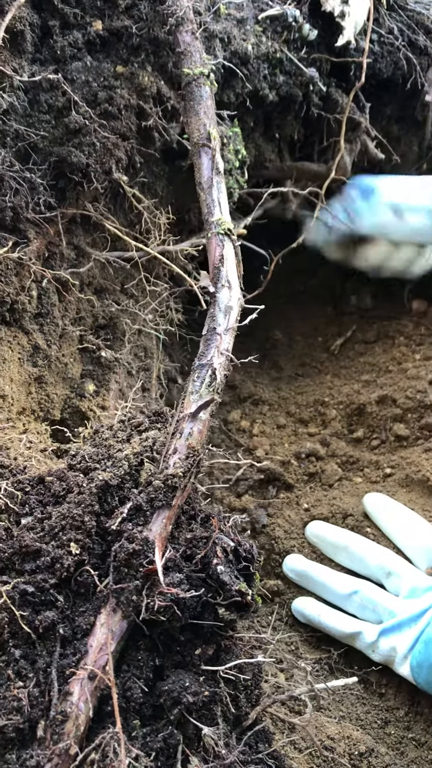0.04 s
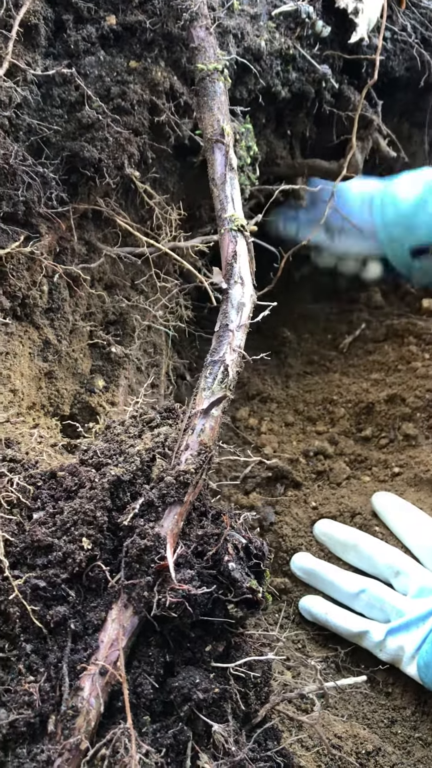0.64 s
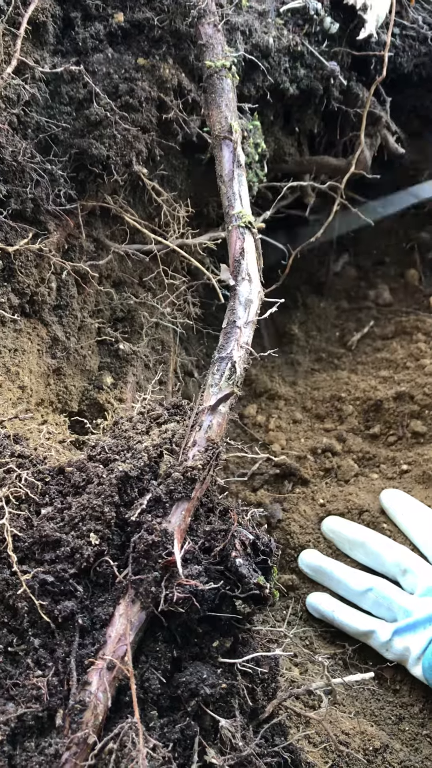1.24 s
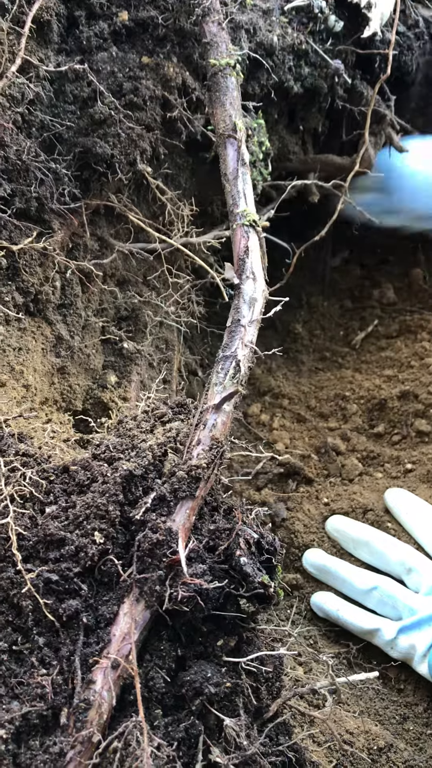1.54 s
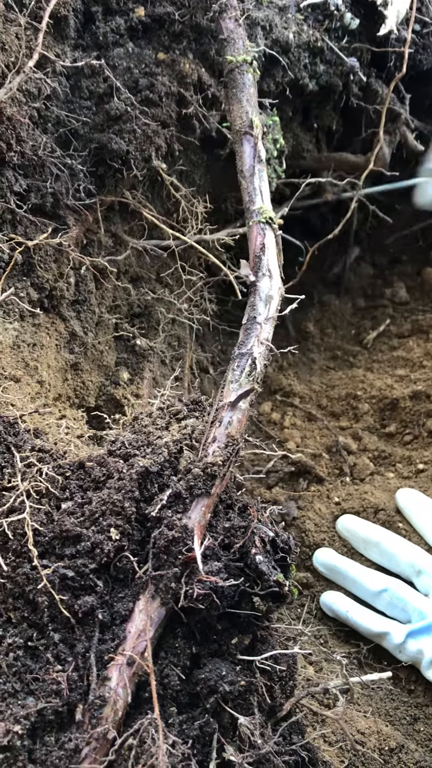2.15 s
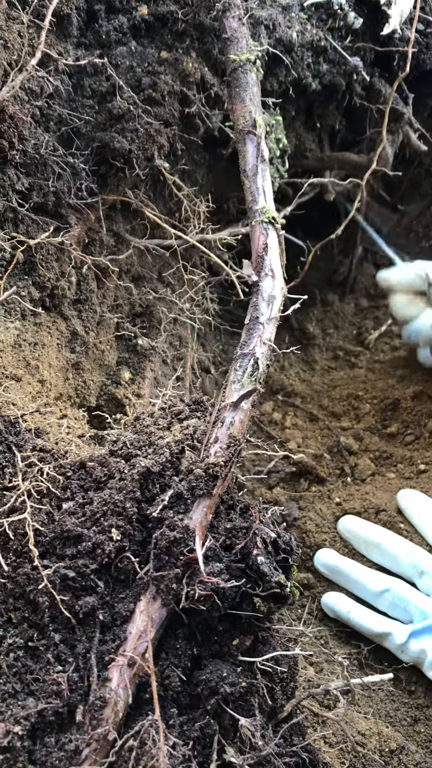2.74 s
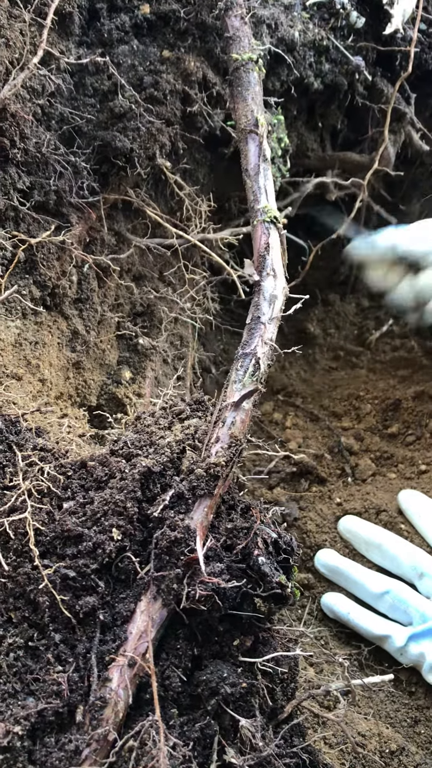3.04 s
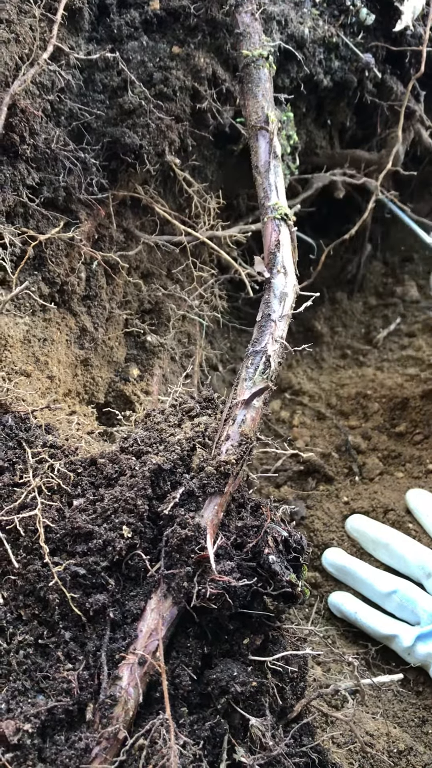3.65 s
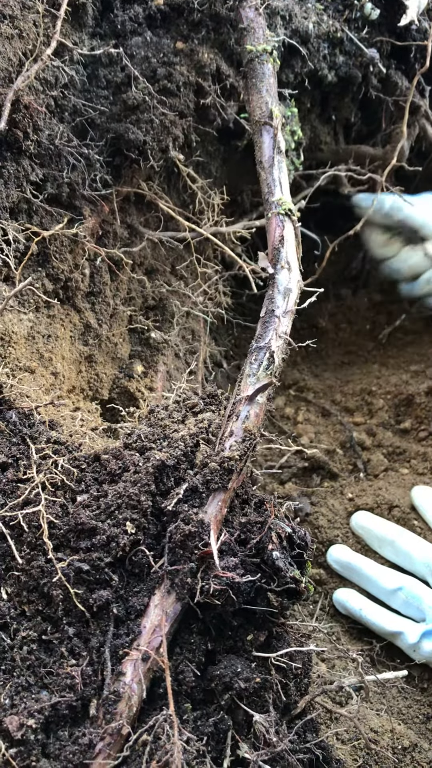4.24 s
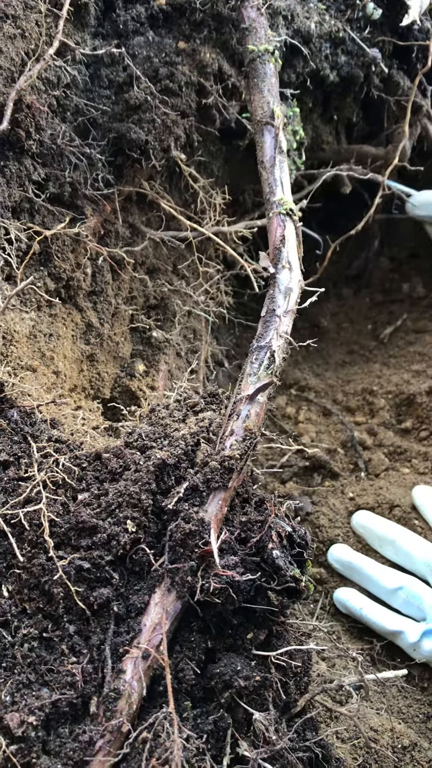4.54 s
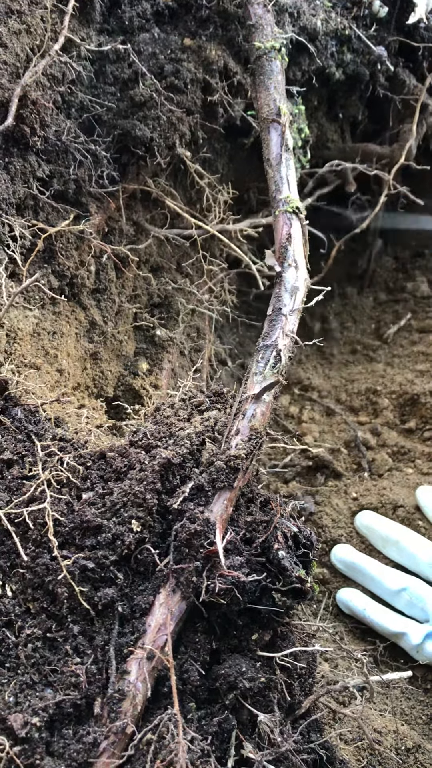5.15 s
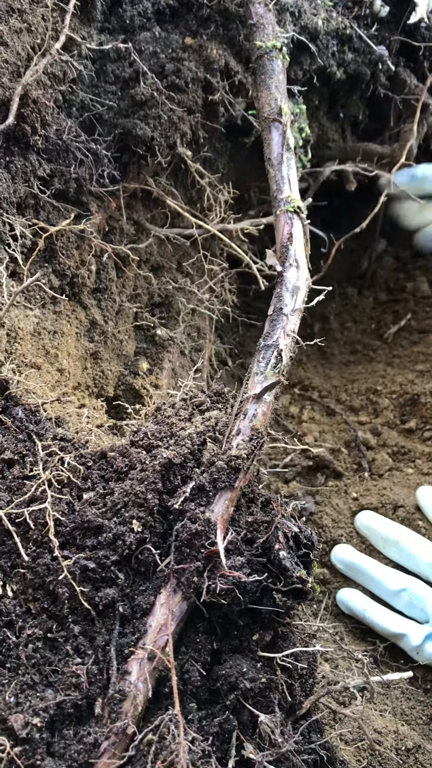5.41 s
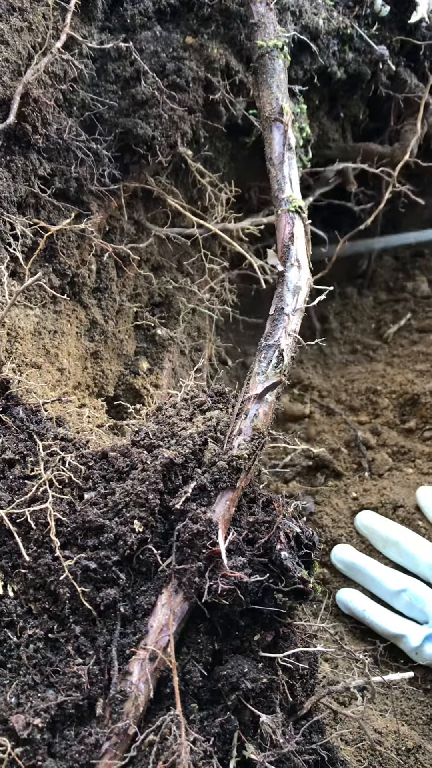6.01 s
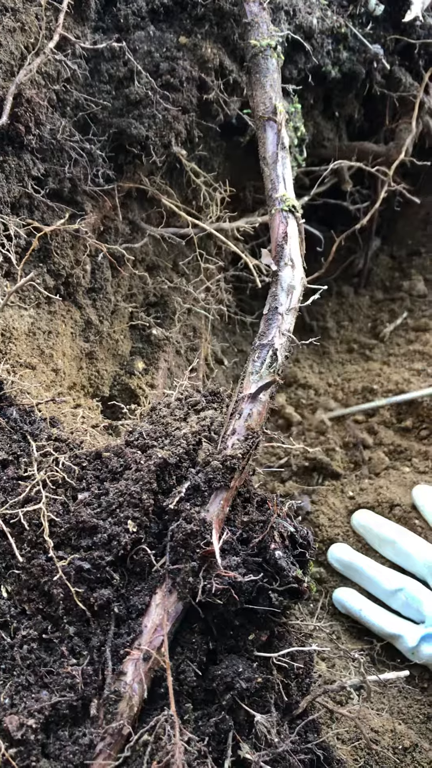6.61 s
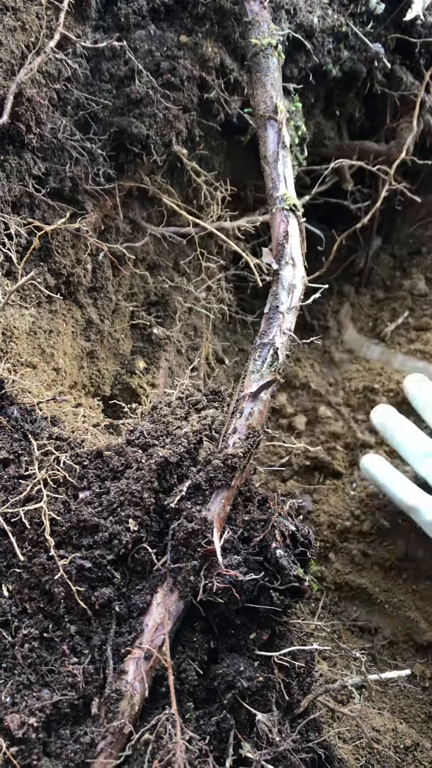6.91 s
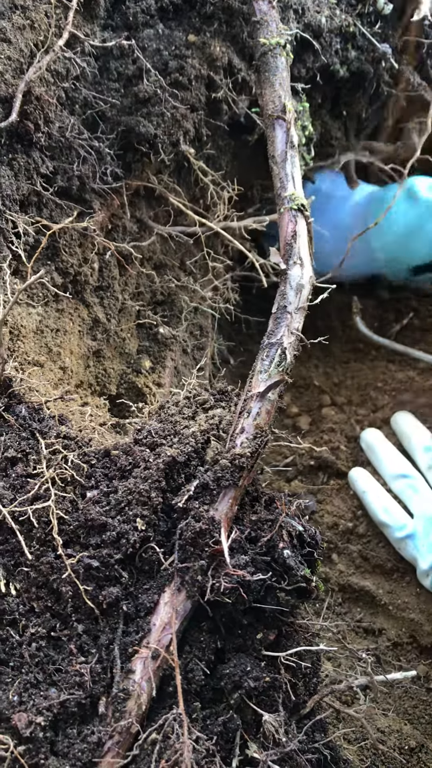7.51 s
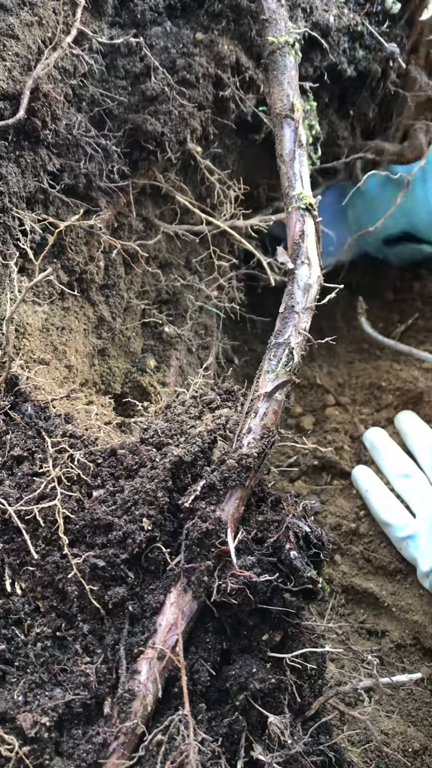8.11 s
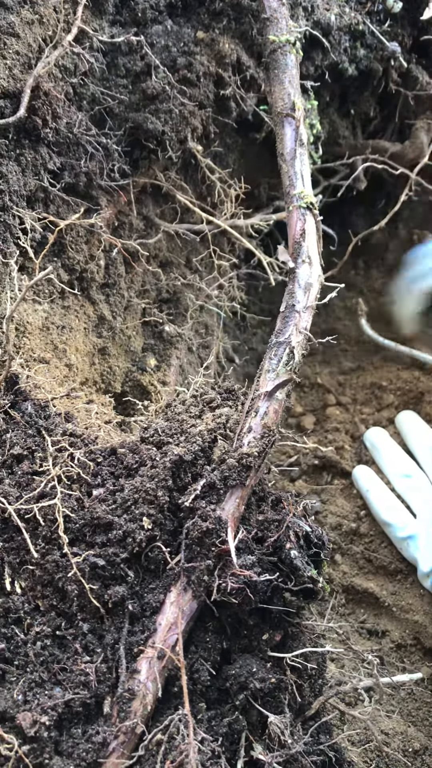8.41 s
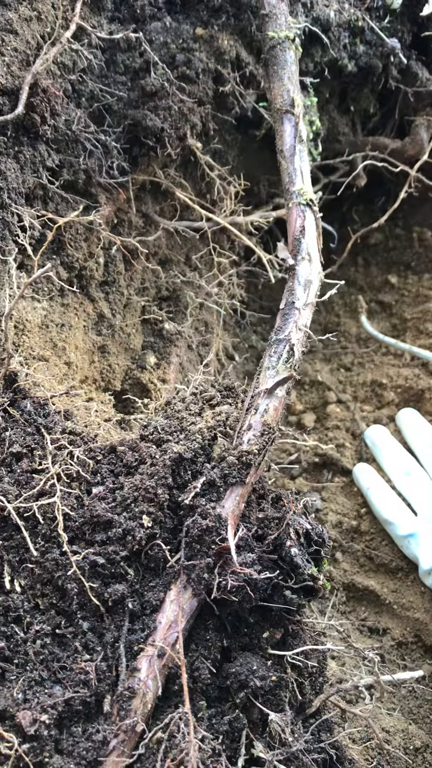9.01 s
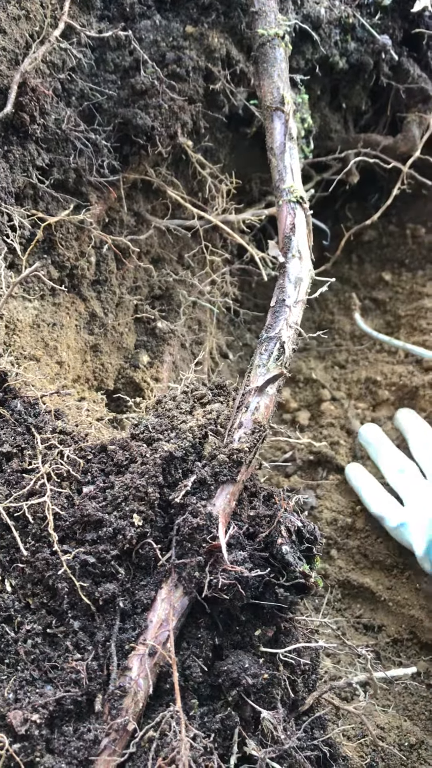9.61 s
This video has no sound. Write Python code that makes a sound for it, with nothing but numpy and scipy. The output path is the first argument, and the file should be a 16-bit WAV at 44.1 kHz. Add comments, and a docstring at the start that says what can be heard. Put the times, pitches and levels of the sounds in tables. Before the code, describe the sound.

Close digging in an earth bank: a metal tip pokes, grates and taps on stone, then loose soil is softly brushed out by hand.

```python
"""A steel tip clicks on a stone, close to the microphone, over a quiet outdoor rumble and a far-off whine.
The thin tool is poked and dragged through an earth bank: it grates through grit, its blade rings briefly,
the packed soil thuds, and the steel squeaks where it sticks and slips on stone.
Loose earth is swept out by hand, while crumbs trickle and snap in the hollow.
A few faint chirps come from the distance."""
import sys
import numpy as np
from scipy import signal
from scipy.fft import rfft, irfft, next_fast_len
from scipy.io import wavfile

SR = 44100
rng = np.random.default_rng(int(sys.argv[2]) if len(sys.argv) > 2 else 0)


def generate_wav(sig):
    """Save sig (samples, or channels by samples) to the path in sys.argv[1] as 16-bit PCM at SR."""
    pcm = np.round(np.clip(np.atleast_2d(sig).T, -1, 1) * 32767).astype(np.int16)
    wavfile.write(sys.argv[1], SR, pcm)


N = 434826
TIME = np.arange(N) / SR

# The blade grates through grit: (time [s], length [s], level [dB], hardest moment [0-1], body [dB],
# edge [dB], contact resonance [Hz], tip wedged [0-1])
GRIT_STROKES = [(0.048, 0.0077, -33, .2, -4, -24, 3020, 1), (0.823, .006, -46, .7, 39, 2, 800, 0.1),
                (0.848, 0.012, -40.5, .5, 9, -4.5, 3400, 0.05), (0.875, .016, -48.5, .5, 22, -2, 3400, 1),
                (0.898, 0.0071, -44, .2, 19, -8, 1500, 0.1), (1.175, 0.067, -54.5, 0.7, 15, -5, 2720, 0.87),
                (2.423, 0.034, -51, 0.6, -4.5, -9, 5700, 0.87),
                (2.456, 0.083, -60.5, 0.26, 1.5, -18, 4000, 1),
                (2.577, 0.057, -55.5, .95, 2, -9, 4700, 0.77),
                (2.656, 0.0067, -40, 0.35, -4, -4, 5070, 0.1), (2.728, 0.0036, -45, .8, 0, -14, 4000, 0),
                (2.7327, 0.0057, -28.5, .6, -2.5, -2, 4500, 0), (2.764, 0.0046, -30.5, 0.4, 0, -8, 1250, 1),
                (2.775, 0.0044, -27, .4, -3, -2, 1250, 1), (2.779, 0.0092, -27, 0.4, -5, -1, 3940, 0.88),
                (2.79, 0.037, -41, 0.4, -6, -10, 3320, 1), (2.826, .034, -42.5, 0.2, -11, -19, 4530, 0.85),
                (2.912, 0.036, -52.5, 0.85, -1, -27, 1400, .6),
                (3.069, 0.02, -53.5, 0.7, -2, -2, 1430, 0.1), (3.188, 0.086, -58, 0.8, 2, -4.5, 4570, 0.9),
                (3.393, 0.024, -50, 0.1, -9, -10, 7600, 0.66),
                (3.5236, .006, -43, 0.5, -3.5, -8, 7510, 0.1),
                (3.561, 0.01, -43.5, .95, -1, -1, 2200, 0.15), (3.84, 0.05, -57, .25, -12, 2, 13600, 0),
                (4.33, 0.025, -58.5, 0.9, 9, -2, 3870, 0.9), (4.365, .022, -49.5, 0.23, 13, -4, 3650, 1),
                (4.816, 0.0053, -54.5, 0.7, 6, -30, 4330, 0), (4.954, 0.046, -56.5, 0.15, 17, 3, 1420, 0.1),
                (5.417, 0.011, -54.5, .8, -3, -9, 970, 0.9), (5.498, 0.0082, -53.5, .7, -20, -27, 1290, 1),
                (5.558, 0.012, -51.5, .5, 11, -13, 960, 1), (5.77, 0.046, -49, .5, 14, -5, 1320, 0)]
# Loose earth is pushed aside: same columns as GRIT_STROKES
EARTH_STROKES = [(0.515, 0.13, -55.5, 0.6, -0.5, -18.5, 1130, 0),
                 (1.501, 0.086, -55, 0.3, 8.5, -16, 2580, 0.04),
                 (1.934, 0.06, -60, 0.86, -2, -52, 1070, 0.1),
                 (3.772, 0.24, -55.5, 0.18, -1.5, -9, 2780, 0.03),
                 (7.03, 0.21, -61, 0.67, 5, -4.5, 4070, 0), (7.607, 0.11, -54.5, 0.68, 11.5, -1, 5700, 0),
                 (8.268, 0.056, -62.5, 0.37, -26, -5, 3900, 0)]


def undb(db):
    """Decibels to gain."""
    return 10 ** (np.asarray(db) / 20)


def unit(x):
    """Scale to rms 1."""
    return x / np.sqrt(np.mean(x ** 2) + 1e-20)


def decay(t, t60):
    """A fade that loses 60 dB every t60 seconds."""
    return undb(-60 * t / t60)


def phase(hz):
    """Running phase of a moving pitch, in radians."""
    return 2 * np.pi * np.cumsum(hz) / SR


def add(out, s, x):
    """Mix x into out from time s on."""
    i = max(int(s * SR), 0)
    out[i:i + len(x)] += x[:max(N - i, 0)]


def spectrum(points, hz):
    """Read (frequency [Hz], level [dB]) points on a log-frequency axis."""
    f, db = np.transpose(points)
    return np.interp(np.log(hz + 1), np.log(f), db)


def tint(x, points):
    """Give a signal the colour of (frequency [Hz], level [dB]) points, at rms 1."""
    size = next_fast_len(len(x))
    gain = undb(spectrum(points, np.fft.rfftfreq(size, 1 / SR)))
    return unit(irfft(rfft(x, size) * gain, size)[:len(x)])


def walk(rate):
    """Random drift with a spread near 1, taking a new value rate times a second."""
    knots = rng.standard_normal(20000)
    return np.interp(TIME * rate, np.arange(len(knots)), knots)


def bell(s, half_s):
    """A smooth rise and fall that peaks at 1 at time s."""
    return np.exp(-np.minimum(((TIME - s) / half_s) ** 2, 50))


def grains(rate, spread_db):
    """Tiny impacts at random, about rate a second; most are faint and a few are strong."""
    hit = rng.random(N) < rate / SR
    return hit * rng.choice([-1, 1], N) * undb(spread_db * np.minimum(rng.exponential(size=N), 4))


def air(level_db=-59.5, wander_db=0.53, hiss_db=-1.77):
    """Low outdoor rumble and a smooth hiss, wandering a little in level."""
    # Colour of the outdoor rumble and hiss, as heard through a microphone that dips near 10.7 kHz:
    # (frequency [Hz], relative level [dB])
    air_through_mic = [(20, -20), (35, -8), (58, 0), (80, -4), (115, -3), (170, -9), (300, -16), (500, -20),
                       (1000, -25), (3000, -30), (5500, -33), (8500, -35), (10700, -39), (14000, -34)]
    colour = [(hz, db + hiss_db * (hz > 400)) for hz, db in air_through_mic]
    return tint(rng.standard_normal(N), colour) * undb(level_db + wander_db * walk(3.6))


def whine_notes(release_s=0.048):
    """Tone gain, rasp gain and rasp pitch ratio of the whine: each note swells, holds and stops."""
    # Notes: (time [s], length [s], relative tone level [dB], relative rasp level [dB],
    # rasp pitch [multiple of the tone], swell [s])
    notes = [(0, 1.17, -63.5, -62.5, 1.05, 0.05), (1.332, 0.873, -64, -63.5, 1.05, 0.026),
             (2.32, 0.12, -63, -63, 1.03, .04), (8.1, 0.91, -71, -61, 1.01, .3),
             (8.93, .27, -67, -63, 1, 0.077), (9.17, 0.37, -69, -65.5, 1, .03),
             (9.702, .12, -78, -61.5, 1, .054)]
    clear, rasp, ratio = np.zeros(N), np.zeros(N), np.ones(N)
    for s, length, clear_db, rasp_db, rasp_ratio, swell_s in notes:
        t = TIME - s
        shape = np.clip(np.minimum(t / swell_s, (length - t) / release_s), 0, 1)
        clear += undb(clear_db) * shape
        rasp += undb(rasp_db) * shape
        ratio[t >= 0] = rasp_ratio
    return clear, rasp, ratio


def whine(gain_db=-8, waver=0.00491, rasp_waver=.016, flutter_hz=200):
    """Far off, a thin, wavering whine sags and recovers; a broad, fluttering rasp rides along with it."""
    # Fundamental, of which only harmonics 2 to 4 sound: (time [s], pitch [Hz])
    fundamental = [(.1, 2065), (.28, 2105), (.42, 2050), (.5, 2075), (.7, 2035), (.95, 2100), (1.1, 2005),
                   (1.35, 2055), (1.55, 2115), (1.84, 1945), (1.93, 2000), (2.04, 2135), (2.11, 2060),
                   (2.18, 1960), (2.35, 2050), (8.2, 2215), (8.7, 2285), (8.79, 2205), (8.94, 2120),
                   (8.99, 1900), (9.04, 1620), (9.085, 1520), (9.15, 1660), (9.2, 2000), (9.3, 2060),
                   (9.38, 1690), (9.52, 1640), (9.72, 2130)]
    hz = np.interp(TIME, *np.transpose(fundamental))
    clear_gain, rasp_gain, rasp_ratio = whine_notes()
    orders = np.arange(2, 5)[:, None]
    colour = [(3000, -2), (4400, 0), (4800, -1), (5100, -9), (5800, -10), (6200, -19), (9000, -35)]
    gains = undb(spectrum(colour, orders * hz))
    gains /= np.sqrt(np.sum(gains ** 2, axis=0) / 2)
    clear_hz = hz * (1 + waver * walk(90))
    rasp_hz = hz * rasp_ratio * (1 + rasp_waver * walk(300))
    clear, rasp = (np.sum(gains * np.sin(orders * phase(f)), axis=0) for f in (clear_hz, rasp_hz))
    lowpass = signal.butter(4, flutter_hz, fs=SR, output="sos")
    flutter = unit(signal.sosfilt(lowpass, rng.standard_normal(N)))
    return distant((clear * clear_gain + rasp * flutter * rasp_gain) * undb(gain_db))


def distant(x, scatter_s=0.013, size=8000):
    """Many weak echoes from the surroundings smear a far sound on its way to the microphone."""
    echoes = rng.standard_normal(size) * np.exp(-np.arange(size) / SR / scatter_s)
    return signal.fftconvolve(x, echoes / np.linalg.norm(echoes))[:N]


def loose_earth(trickle_db=-72, trickle_dust_db=-74, spill_db=-67, spill_dust_db=-71.5):
    """How strongly crumbs and dust move: a faint trickle, a spill at each stroke, a swell at each brush."""
    # Hand or blade brushes loose crumbs: (peak time [s], length [s], crumbs [dB], fine dust [dB])
    brushes = [(0.3, 0.14, -79, -65), (0.732, 0.13, -63, -76), (1.7, 0.043, -61, -64),
               (2.12, 0.23, -65.5, -73), (2.275, 0.12, -61.5, -62), (4.045, 0.074, -63, -74),
               (4.755, 0.42, -66, -78), (5.243, 0.18, -61.5, -65), (5.52, 0.42, -65.5, -67),
               (5.947, 0.12, -64, -72), (6.222, 0.2, -64, -64), (6.84, 0.41, -63, -67.5),
               (7.176, 0.51, -64.5, -67), (7.556, 0.15, -63.5, -70), (7.98, 0.41, -69, -83),
               (8.173, 0.59, -66.5, -67), (8.537, 0.37, -69, -66.5), (9.308, 0.2, -70, -70.5),
               (9.738, 0.64, -67, -66)]
    # The loose earth quietens: (middle time [s], length [s], dip [dB])
    lulls = [(3.724, 0.11, -14), (4.572, 0.06, -11), (9.001, 0.75, -0.5)]
    rise_s, fall_s = 0.1, 0.073  # a spill starts as the blade nears and trickles on after it
    spill = np.zeros(N)
    for s, length, *_ in GRIT_STROKES + EARTH_STROKES:
        away = np.maximum((s - TIME) / rise_s, (TIME - s - length) / fall_s)
        spill = np.maximum(spill, np.exp(-np.clip(away, 0, 20)))
    crumb_power = undb(trickle_db) ** 2 + (undb(spill_db) * spill) ** 2
    dust_power = undb(trickle_dust_db) ** 2 + (undb(spill_dust_db) * spill) ** 2
    for s, length, db, dust_db in brushes:
        swell = bell(s, length / 2)
        crumb_power += (undb(db) * swell) ** 2
        dust_power += (undb(dust_db) * swell) ** 2
    calm = undb(sum(db * bell(s, length / 2) for s, length, db in lulls))
    return calm * np.sqrt(crumb_power), calm * np.sqrt(dust_power)


def crumbs(coarse_db=-2, fine_db=-3, grit_db=-12, crackle_db=-9):
    """Close by, crumbs and dust rub on the cut face; grains of grit tick and dry sand crackles."""
    crumb_gain, dust_gain = loose_earth()
    coarse = tint(grains(3500, 2.56), [(100, 1.5), (250, 7.5), (600, 3), (1200, 0), (3000, -3),
                                       (5000, -8), (8000, -19.5), (16000, -37.5)])
    fine = tint(grains(6500, 2.1), [(2000, -35), (4000, -0.5), (6000, 3.5), (8800, 0.5),
                                    (10700, 0.5), (13000, 6), (16000, -3.5)])
    grit = sum(signal.fftconvolve(grains(9, 4), contact(0, -5, hz, 12))[:N]
               for hz in np.geomspace(1000, 7000, 5))
    grit = unit(signal.fftconvolve(grit, blade(ring_db=-55, wedged=0))[:N])
    rubbing = coarse * undb(coarse_db + 4 * walk(29)) + grit * undb(grit_db)
    crackle = sum(signal.fftconvolve(grains(25, 4), contact(-12, -3, hz, 16))[:N]
                  for hz in np.geomspace(4000, 13000, 5))
    dust = fine * undb(fine_db + 3.1 * walk(32)) + unit(crackle) * undb(crackle_db)
    return rubbing * crumb_gain + dust * dust_gain


def contact(body_db, edge_db, ring_hz, ring_db, width=.16, size=1024):
    """Response to one impact: big clods add body, hard edges add treble, the touched stone rings."""
    # Colour of every contact, as heard through a microphone that dips near 10.7 kHz:
    # (frequency [Hz], gain [dB])
    contact_through_mic = [(40, -49), (120, 10), (380, 2.5), (540, -6.5), (950, 0), (1350, -2.5),
                           (1750, -4), (2800, -0.5), (5000, -2), (8800, 0.5), (10800, -4.5), (13500, 0.5),
                           (16000, -0.5)]
    hz = np.fft.rfftfreq(size, 1 / SR)
    db = spectrum(contact_through_mic, hz)
    db += spectrum([(900, body_db), (3000, 0.012), (14000, edge_db)], hz)
    db += ring_db / (1 + ((hz / ring_hz - 1) / width) ** 2)
    cepstrum = irfft(np.log(undb(db)))
    cepstrum[1:size // 2] *= 2  # folded, so that nothing sounds before the impact
    cepstrum[size // 2 + 1:] = 0
    return irfft(np.exp(rfft(cepstrum)))


def blade(ring_db, wedged, detune=0.006, lag_s=.0012, size=3000):
    """An impact runs along the blade, treble first, and leaves a ring that shifts if the tip is wedged."""
    # Steel damped by soil and hand: (tip free [Hz], tip wedged [Hz], relative level [dB], t60 [s])
    modes = [(1450, 1500, -4, 0.045), (2100, 2680, 3, 0.022), (3950, 4450, 9, 0.01),
             (5300, 6100, 1.5, 0.019), (7070, 10000, 2.5, 0.014), (9920, 7900, 0.5, .018),
             (12440, 12500, 0, .012), (13750, 20000, 4.5, .011)]
    t, f = np.arange(size) / SR, np.fft.rfftfreq(size, 1 / SR)
    free_hz, wedged_hz, db, t60 = np.transpose(modes)[:, :, None]
    hz = free_hz + np.clip(wedged, 0, 1) * (wedged_hz - free_hz)
    hz *= 1 + detune * rng.standard_normal(db.shape)
    ring = np.sum(undb(db + ring_db) * np.cos(2 * np.pi * hz * t) * decay(t, t60), axis=0)
    delay = lag_s * np.sqrt(1000 / (f + 500))
    dispersion = np.exp(-2j * np.pi * np.cumsum(delay) * SR / size)
    return irfft(rfft((t == 0) + ring) * dispersion, size)


def clicks(chatter_db=-10, crush_db=-29, crush_t60=.012, size=2048):
    """The tip strikes a stone and chatters on it; grit crushed under it crackles faintly."""
    # (time [s], level over the first 4 ms [dB], body [dB], edge [dB], contact resonance [Hz],
    # resonance [dB], chatter t60 [s], blade ring [dB], tip wedged [0-1])
    stone_hits = [(0.046, -25, -4.5, -19, 3770, 7.5, 0.0028, -38, 0.6),
                  (.048, -31.5, -12, -23, 3300, 8, .004, -37, 0.96),
                  (0.058, -31.5, 11, -9, 5030, 12, .0074, -44, 1),
                  (.061, -41, 11, -10, 5250, 14, .004, -46, 1),
                  (0.3833, -51, -9, -12, 6340, 5, .0072, -44, 0),
                  (0.8127, -41.5, -8, -15, 1250, 10, .0092, -41, 0),
                  (.889, -52, -3, -6, 3600, 12, .004, -42, 1),
                  (0.8945, -44.5, -3, 4, 3600, 11, 0.0099, -42, 0),
                  (0.8971, -37, 8, -14, 3320, 23, .008, -44, 0.1),
                  (1.1818, -48, 2, -14, 6000, 9, 0.0095, -50, 1),
                  (1.975, -56, 2, -7, 1150, 18, .019, -46, 0),
                  (2.0702, -58, -2, -8, 2580, 15, .011, -46, 0),
                  (2.099, -56, -10, 8, 13700, 4, .005, -46, 0),
                  (2.1287, -55, -7, -28, 2600, 6, .012, -46, 0),
                  (2.4489, -44, -9, -17, 5530, 10, .012, -40, 0.2),
                  (2.4527, -45, -14, -26, 3800, 2, 0.0094, -42, 0.8),
                  (2.6293, -36.5, -12, 7.5, 2020, 16, .0065, -42, 0),
                  (2.6705, -22.5, -5, -9.5, 5440, 7.5, .0045, -33.5, 0),
                  (2.7543, -16, 1, -2, 3350, 12, 0.012, -33.5, 0),
                  (2.973, -43, -1, -17, 1110, 5, 0.017, -42, 0.06),
                  (3.011, -55, -4, -9, 1500, 21, .0066, -42, 0),
                  (3.056, -52, -3, -17, 2100, 8, .016, -44, 0),
                  (3.287, -53.5, -7, -10, 6060, 8, .017, -36, 1),
                  (3.318, -54.5, -24, -12, 6110, 11, 0.0096, -33, 1),
                  (3.403, -46.5, -10, -10, 950, 18, 0.0039, -35, 0.9),
                  (3.5734, -34, -7, -5, 3900, 4, 0.017, -28, 0.08),
                  (3.829, -51, -15, -9, 3900, 6, .005, -38, 0), (3.855, -48, 5, -5, 2100, 2, .008, -40, 0),
                  (4.11, -32.5, -7.5, -6.5, 3100, 4.5, 0.0039, -34, 0.9),
                  (4.284, -52, 0, -21, 2740, 6, .016, -44, 1),
                  (4.36, -49.5, 0, -3, 9000, 6, .004, -42, 0.9),
                  (4.386, -45, 4, -4, 3600, 14, .012, -40, 1),
                  (4.3895, -49.5, 2, -3, 9000, 5, .006, -40, 0.9),
                  (4.4618, -37.5, -5, -3, 3490, 23, .004, -35, 0.77),
                  (4.8214, -53, -2, -29, 4480, 9, .012, -42, 0),
                  (4.9536, -50.5, -10, -12, 890, 10, 0.0061, -44, 0.1),
                  (5.0257, -56, -11, -3, 6110, 14, .0046, -46, 1),
                  (5.4133, -53, -16, 1, 5900, 16, .005, -40, 1),
                  (5.503, -46, -8, -32, 1330, 11, .0095, -42, 1),
                  (5.806, -41.5, 6, 4, 2400, 12, 0.011, -42, 0),
                  (5.819, -43, 6, -28, 2140, 4, .009, -39, 0), (5.827, -49, 10, -32, 1900, 6, .008, -42, 0),
                  (6.15, -51.5, -3, -50, 1860, 15, .0039, -31, 1),
                  (6.202, -39, -5, -14, 3950, 3, 0.0057, -23, 0.07),
                  (7.091, -52.5, -6.5, -5, 1060, 13.5, 0.0097, -49, 0),
                  (8.3466, -50.5, -4, -2, 4590, 9, 0.0074, -46, 0.06),
                  (8.674, -54, -10, -8, 1680, 19, 0.008, -46, 0)]
    out, t = np.zeros(N), np.arange(size) / SR
    attack = int(.004 * SR)
    for s, db, *colour, chatter_t60, ring_db, wedged in stone_hits:
        fade = undb(chatter_db) * decay(t, chatter_t60) + undb(crush_db) * decay(t, crush_t60)
        force = (t == 0) + fade * rng.uniform(-1, 1, size)
        stone = signal.fftconvolve(force, contact(*colour))
        click = signal.fftconvolve(stone, blade(ring_db, wedged))
        add(out, s, click * undb(db) / np.sqrt(np.mean(click[:attack] ** 2)))
    return out


def strokes(table, rate, ends_db, slip_hz, slip_db, ring_db, stone_db, graze_s=0.003):
    """Grains break away in uneven sticks and slips, under a force that grazes, swells and eases off."""
    out = np.zeros(N)
    impacts = grains(rate, spread_db=1.5) * undb(slip_db * walk(slip_hz))
    for s, length, db, crest, *colour, wedged in table:
        t = np.arange(-graze_s, length + graze_s, 1 / SR)
        moments = [-graze_s, 0, np.clip(crest, .05, .95) * length, length, length + graze_s]
        push_db = np.interp(t, moments, [-32, ends_db, 0, ends_db, -32])
        start = int((s - graze_s) * SR)
        force = impacts[start:start + len(t)] * undb(push_db)
        grit = signal.fftconvolve(force, contact(*colour, stone_db))
        stroke = signal.fftconvolve(grit, blade(ring_db, wedged))
        rms = np.sqrt(np.sum(stroke ** 2) / (length * SR) + 1e-20)
        add(out, s - graze_s, stroke * undb(db) / rms)
    return out


def scrapes():
    """The blade grates through grit: dense grains in fast, hard slips."""
    return strokes(GRIT_STROKES, rate=7000, ends_db=-5.5, slip_hz=357, slip_db=4.5,
                   ring_db=-35.5, stone_db=6.5)


def thuds(sag=0.19, settle_s=0.023, wobble=0.084, rough=0.29, linger=2.43, size=12000):
    """The bank gives way in uneven, sinking low cycles and a hollow knock; crushed earth rumbles on."""
    # Packed soil takes a push: (time [s], level [dB], mid pitch [Hz], rise [s], t60 [s])
    pushes = [(.051, -31, 170, 0.0019, 0.037), (0.0583, -26, 154, 0.0034, 0.043),
              (0.851, -35.5, 250, 0.0014, 0.028), (.871, -37, 155, .002, 0.047),
              (0.883, -33, 174, 0.0036, 0.033), (1.182, -37, 145, 0.0021, 0.039),
              (1.976, -42.5, 88, 0.013, 0.12), (2.671, -39, 156, 0.003, 0.064),
              (2.757, -16, 124, 0.0025, 0.06), (2.777, -25.5, 143, 0.0041, 0.066),
              (4.112, -35, 190, 0.0011, 0.029), (4.389, -26.5, 128, 0.0065, 0.029),
              (4.4643, -33.5, 159, 0.0016, 0.075), (5.518, -45.5, 152, 0.0033, 0.044),
              (5.583, -35, 180, 0.0089, 0.023), (5.812, -49, 165, 0.0037, 0.1),
              (6.619, -45, 227.4, 0.049, 0.106), (7.163, -44.5, 146, 0.011, .05),
              (7.315, -50.5, 626, .0014, 0.034), (7.687, -40.5, 205, 0.012, 0.073),
              (7.98, -45.5, 175, 0.0049, 0.048), (8.362, -46.5, 140, 0.008, 0.038)]
    earth_colour = [(55, -13), (110, 3.5), (230, 10.5), (370, -9.5), (550, -24),
                    (1200, -23.5), (3000, -48.5)]
    knock_db, knock_hz, knock_t60 = -11, 400, .02
    out, t = np.zeros(N), np.arange(size) / SR
    knock = undb(knock_db) * decay(t, knock_t60) * np.sin(2 * np.pi * knock_hz * t)
    for s, db, hz, rise, t60 in pushes:
        swell = np.minimum(t / rise, 1)
        fade = decay(np.maximum(t - rise, 0), t60)
        sinking = 2 * np.exp(-t / (settle_s + rise)) - 1
        pitch = hz * (1 + sag * sinking + wobble * walk(170.5)[:size])
        earth = tint(rng.standard_normal(size), earth_colour)
        thud = fade * np.sin(phase(pitch)) + rough * fade ** (1 / linger) * earth + knock
        add(out, s, undb(db) * swell * thud / np.hypot(1, 2 * rough))
    return out


def sweeps():
    """Loose earth is pushed aside: sparser grains in slower, softer slips."""
    return strokes(EARTH_STROKES, rate=2200, ends_db=-12.5, slip_hz=148.4, slip_db=2.5,
                   ring_db=-40, stone_db=3.5)


def ticks(edge_db=-8, ring_db=13, t60=0.013, size=1024):
    """Lone crumbs snap or drop near the microphone, each with a pitch of its own."""
    # (time [s], peak level [dB], body [dB], pitch [Hz])
    snaps = [(1.119, -51, 20, 1500), (1.239, -43.5, 10, 9000), (1.315, -45.5, 9, 2800),
             (1.369, -48, -4, 2700), (1.453, -47, -12, 13000), (1.694, -45, 3, 6000),
             (1.752, -46.5, 15, 3000), (2.1075, -53, -10, 9000), (2.169, -45.5, 8, 3950),
             (2.342, -50, 9, 4000), (2.49, -43, 6, 1400), (2.523, -46, -3, 3600), (2.6425, -45, 6, 5500),
             (3.039, -48, 8, 2200), (3.638, -50, 9, 6760), (3.952, -46, -2, 4500), (4.217, -45.5, 22, 3020),
             (4.503, -52, -6, 4200), (4.5075, -48, -6, 9100), (4.729, -48.5, -14, 3800),
             (5.637, -48, 27, 1000), (5.902, -49.5, -7, 8000), (5.992, -51, -8, 9700),
             (6.84, -55, -1, 4000), (7.564, -43.5, 11, 12500), (7.695, -45, 4, 6000),
             (7.764, -48, 14, 4000), (7.914, -51.5, 14, 1200), (8.085, -46, 15, 5000),
             (8.36, -46, -2, 9500), (8.494, -48, -6, 5800), (8.614, -48, -8, 6500), (8.637, -44, -6, 9800),
             (8.7, -50, -10, 12500)]
    out, t = np.zeros(N), np.arange(size) / SR
    for s, db, body_db, hz in snaps:
        force = rng.standard_normal(size) * decay(t, t60)
        snap = signal.fftconvolve(force, contact(body_db, edge_db, hz, ring_db))
        add(out, s, snap * undb(db) / np.abs(snap).max())
    return out


def chirps():
    """Faint, short gliding notes from far away."""
    # (time [s], length [s], start pitch [Hz], middle pitch [Hz], end pitch [Hz], level [dB])
    notes = [(1.248, 0.082, 1350, 1264, 1050, -72), (1.891, 0.07, 2940, 3220, 3050, -67.5),
             (1.902, 0.097, 1130, 1067, 950, -75), (4.411, 0.108, 3080, 3350, 3430, -72),
             (9.179, 0.064, 4480, 4470, 4380, -71)]
    out = np.zeros(N)
    for s, length, start_hz, middle_hz, end_hz, db in notes:
        u = np.linspace(0, 1, int(length * SR))
        hz = np.interp(u, [0, .35, .6, 1], [start_hz, middle_hz, middle_hz, end_hz])
        add(out, s, undb(db) * unit(np.sin(np.pi * u) * np.sin(phase(hz))))
    return distant(out, scatter_s=0.052)


def squeaks(jitter=0.12, flutter_db=3, overtone_db=-13):
    """The blade sticks and slips fast on a stone: a brief, hoarse note with two overtones."""
    # (time [s], length [s], start pitch [Hz], end pitch [Hz], level [dB])
    slips = [(2.673, 0.0064, 2850, 2680, -35), (2.79, 0.015, 2940, 2820, -42),
             (2.829, 0.009, 2940, 3100, -35), (2.84, 0.014, 2630, 2630, -39.5),
             (2.851, 0.017, 2780, 2650, -46)]
    out, orders = np.zeros(N), np.arange(1, 4)[:, None]
    for s, length, start_hz, end_hz, db in slips:
        u = np.linspace(0, 1, int(length * SR))
        hz = np.geomspace(start_hz, end_hz, len(u)) * (1 + jitter * walk(1700)[:len(u)])
        tone = np.sum(undb(overtone_db * (orders - 1)) * np.sin(orders * phase(hz)), axis=0)
        push = np.interp(u, [0, .15, .5, 1], [0, 1, .8, 0]) * undb(flutter_db * walk(400)[:len(u)])
        add(out, s, undb(db) * unit(tone * push))
    return out


def hollow(x, near_db=-17, near_t60=0.025, far_db=-31, far_t60=0.55, size=16000):
    """The earth walls answer at once; the surroundings add a very faint tail."""
    t = np.arange(size) / SR
    response = np.zeros(size)
    for db, t60 in ((near_db, near_t60), (far_db, far_t60)):
        echoes = tint(rng.standard_normal(size), [(200, 5.5), (3000, -2), (14000, -5.5)])
        tail = echoes * decay(t, t60) * (t > .0015)
        response += undb(db) * tail / np.linalg.norm(tail)
    return x + signal.fftconvolve(x, response)[:N]


def scene():
    """One microphone close to the hollow: tool and soil in front, the outdoor background behind."""
    digging = hollow(scrapes() + sweeps() + clicks() + squeaks() + ticks() + thuds())
    return (digging + crumbs() + whine() + chirps() + air())[None]


def record(dry, top_hz=16100):
    """The recorder cuts the highest treble steeply."""
    return signal.sosfilt(signal.ellip(10, .2, 70, top_hz, fs=SR, output="sos"), dry)


dry = scene()
out = record(dry)
generate_wav(out)
```